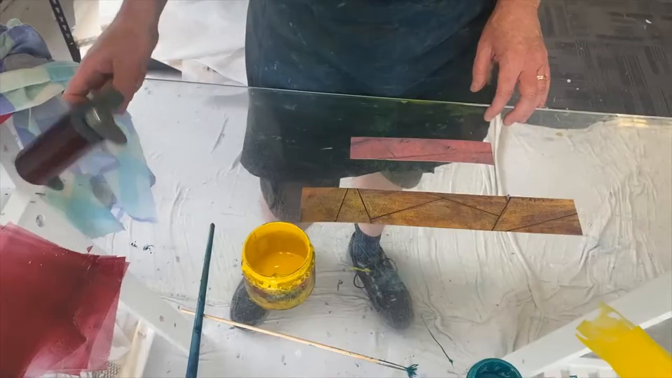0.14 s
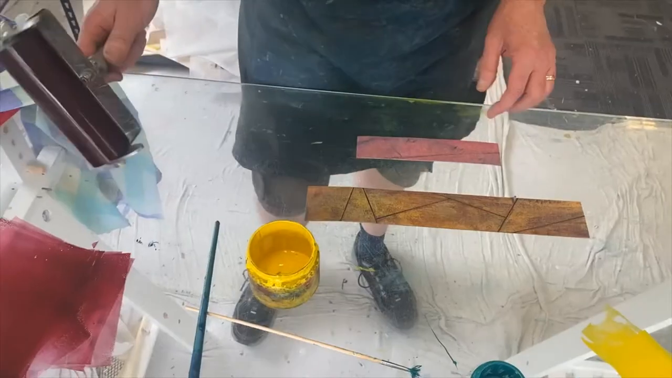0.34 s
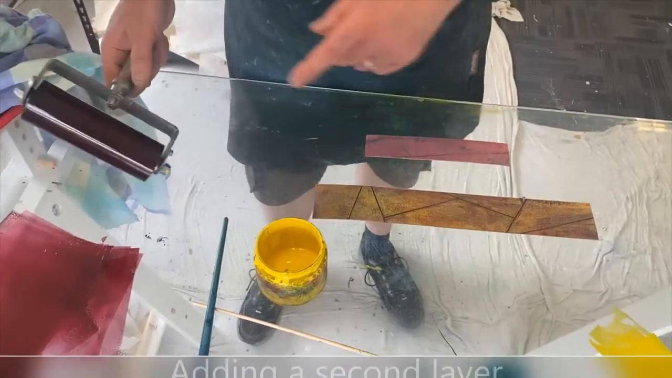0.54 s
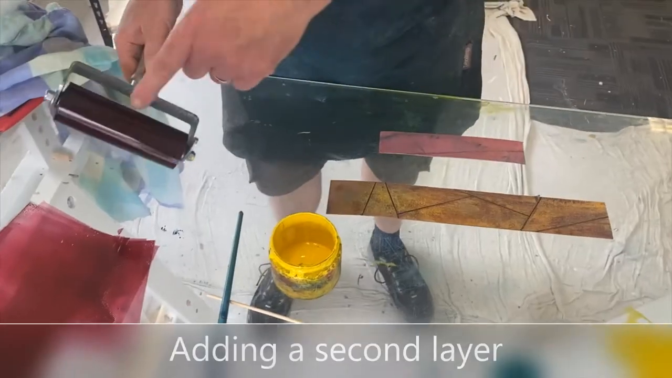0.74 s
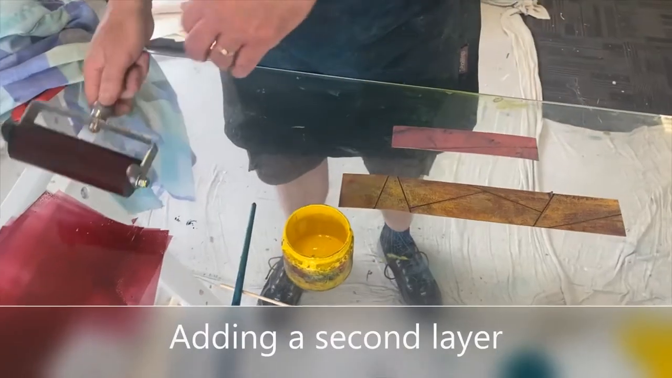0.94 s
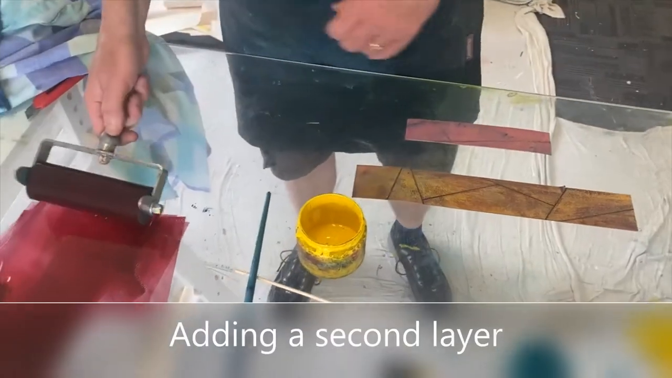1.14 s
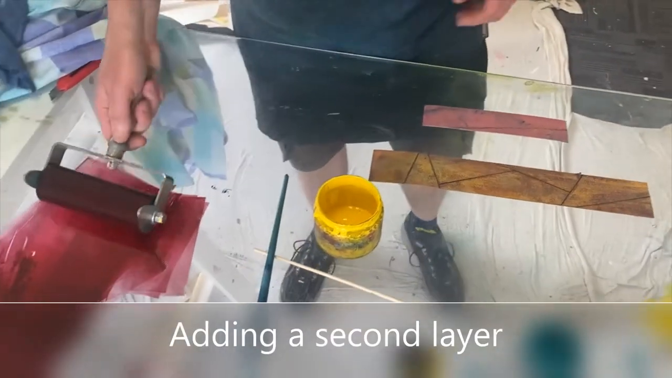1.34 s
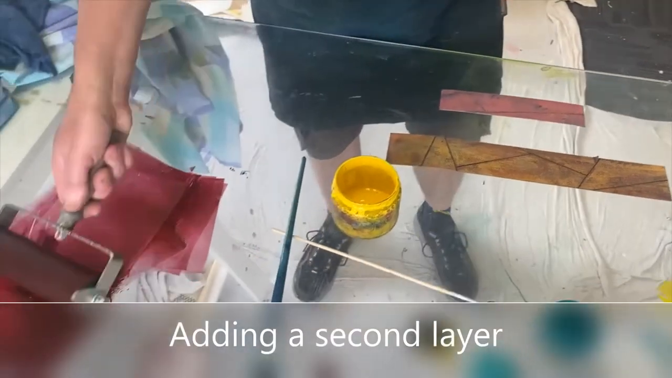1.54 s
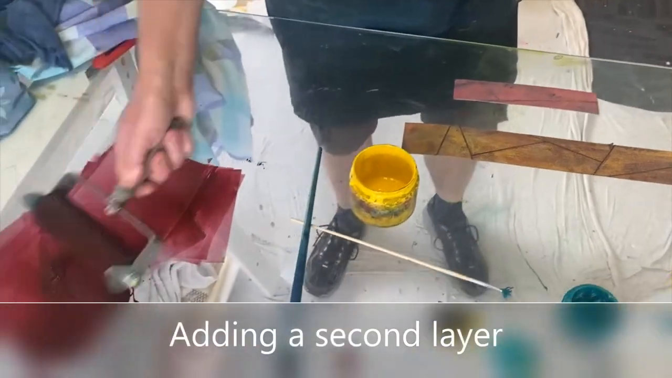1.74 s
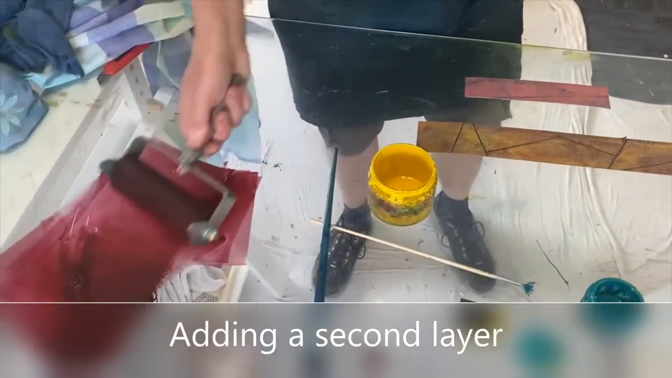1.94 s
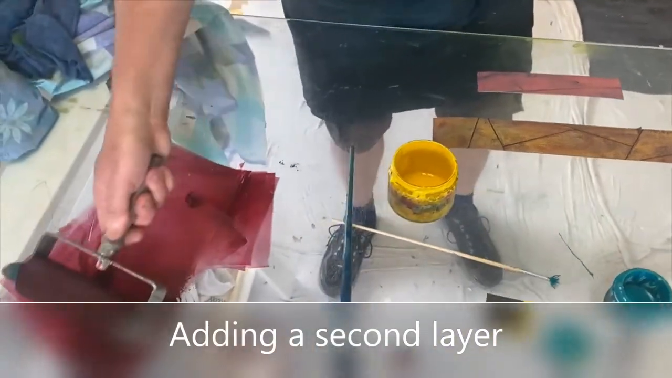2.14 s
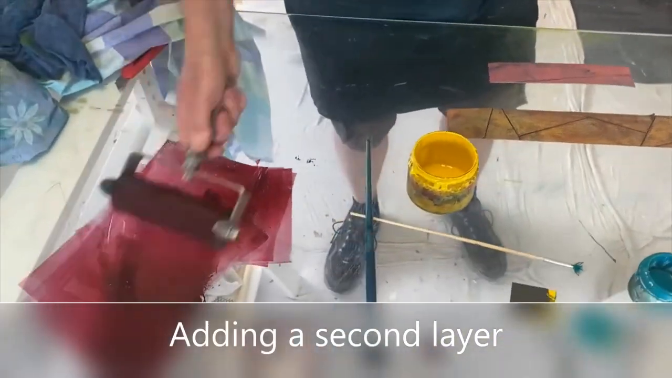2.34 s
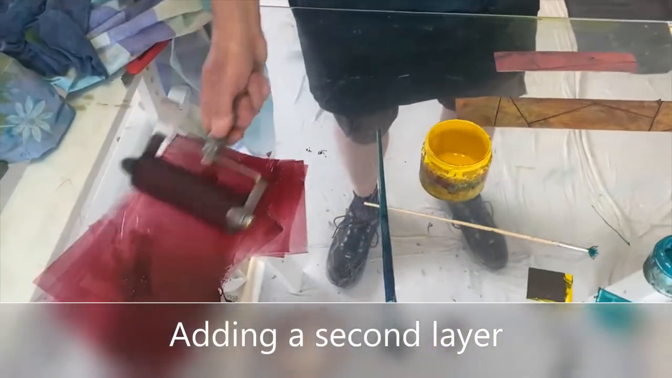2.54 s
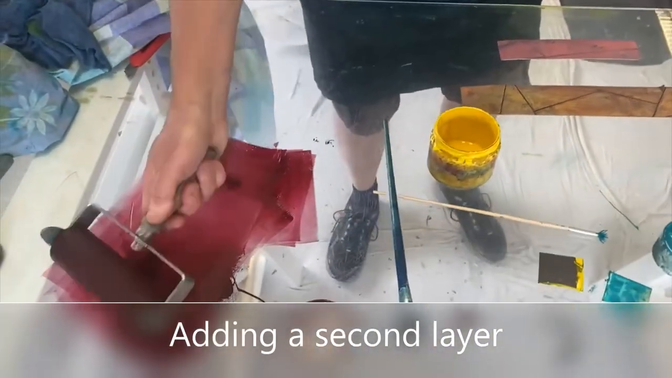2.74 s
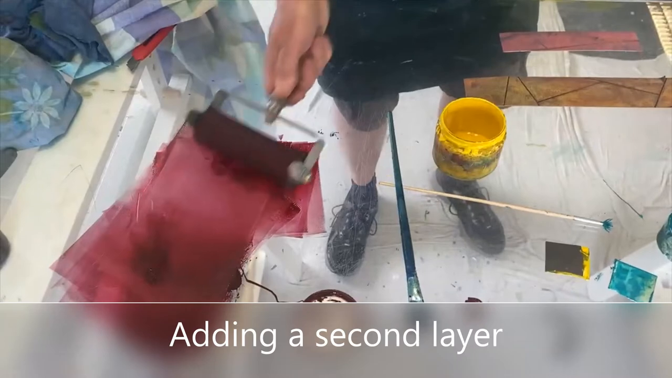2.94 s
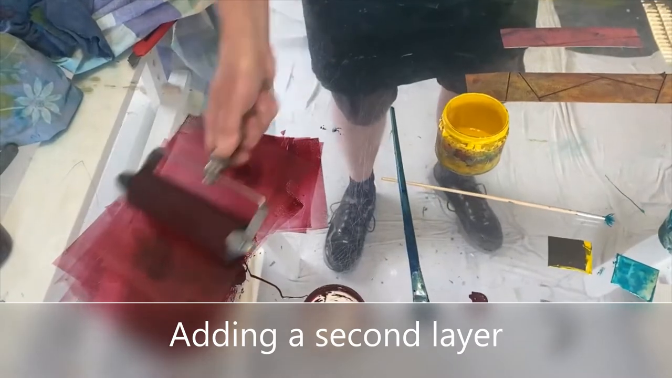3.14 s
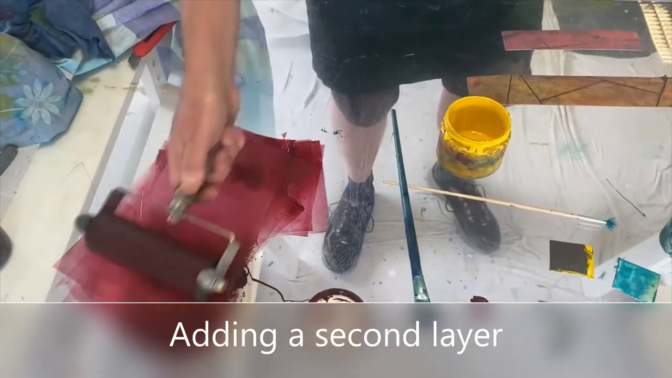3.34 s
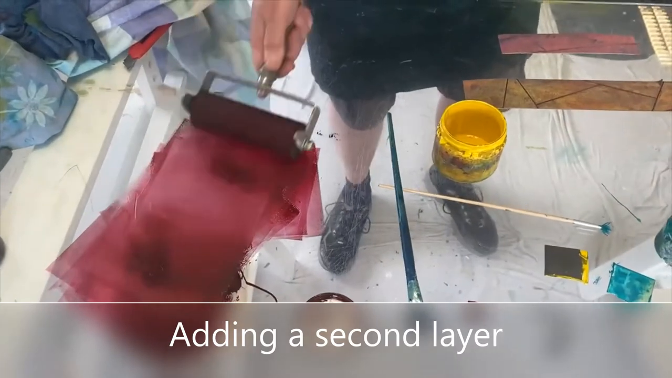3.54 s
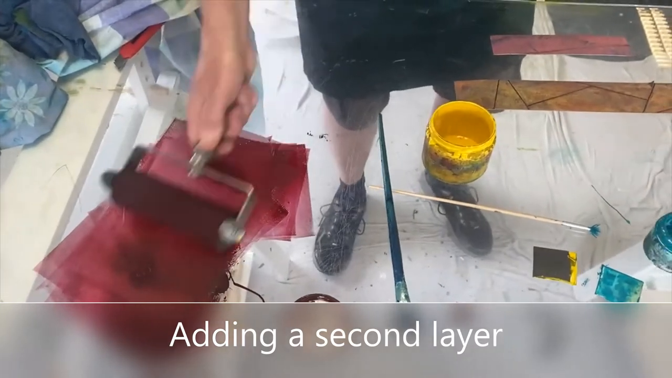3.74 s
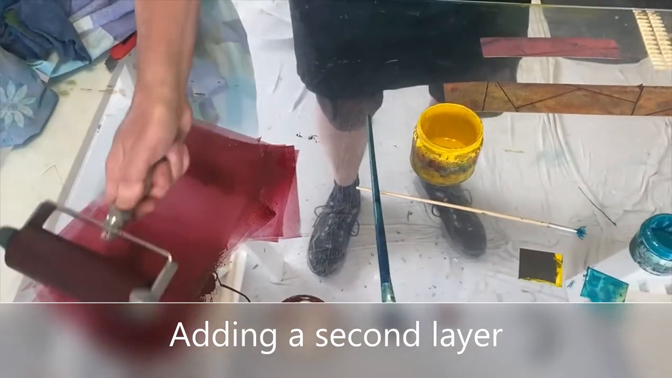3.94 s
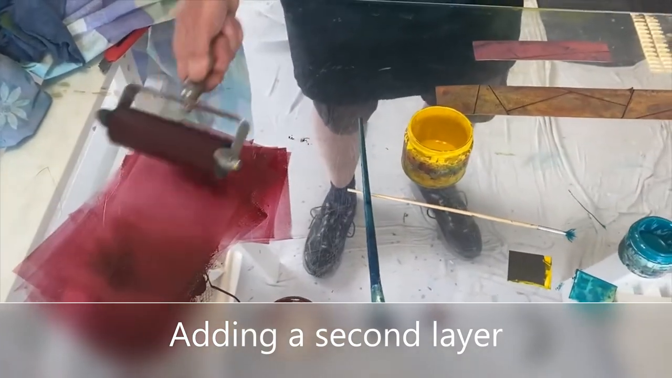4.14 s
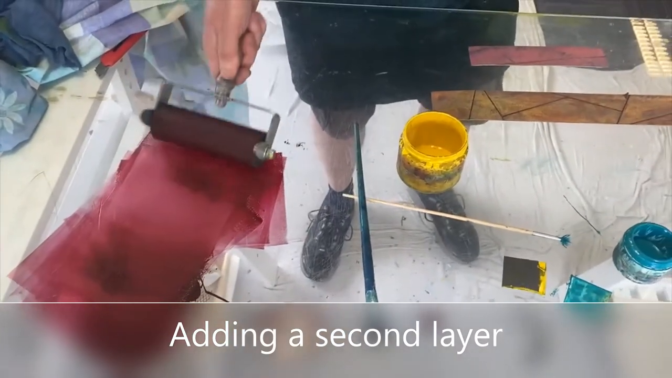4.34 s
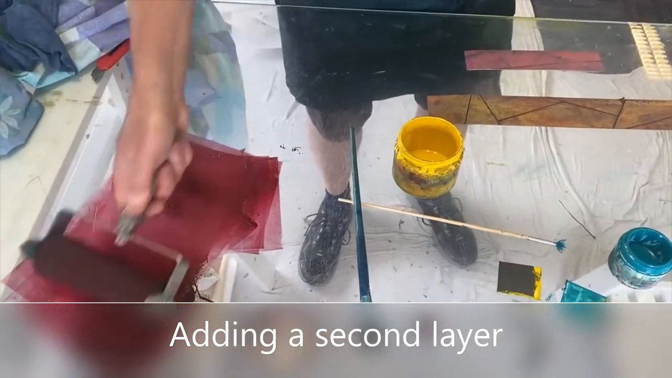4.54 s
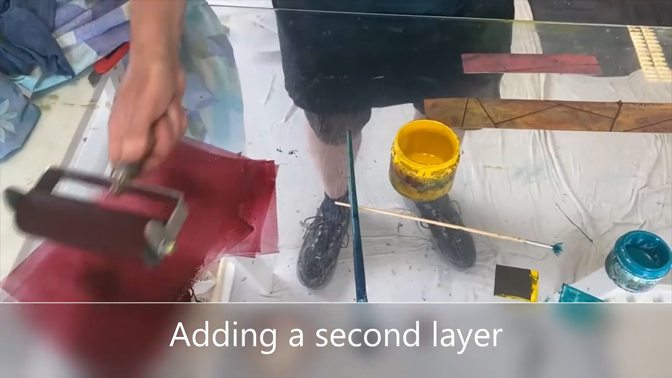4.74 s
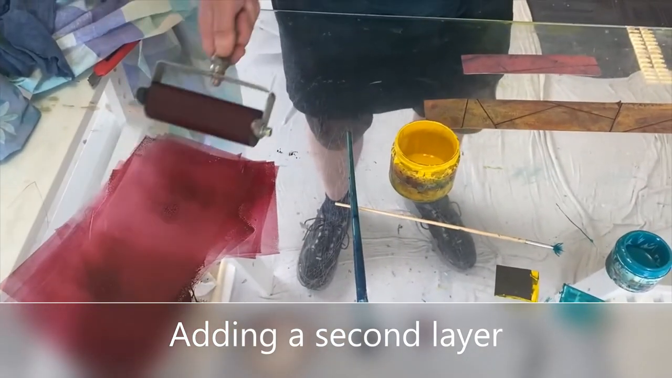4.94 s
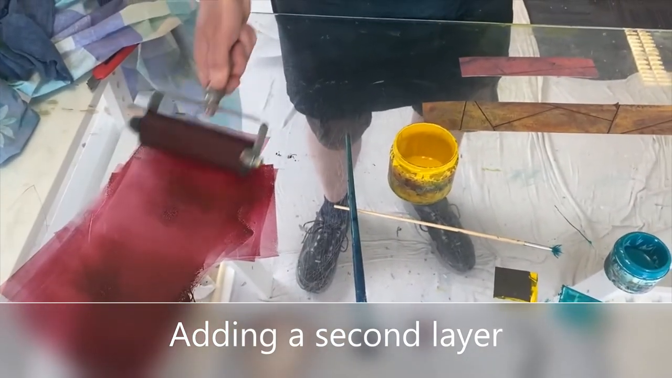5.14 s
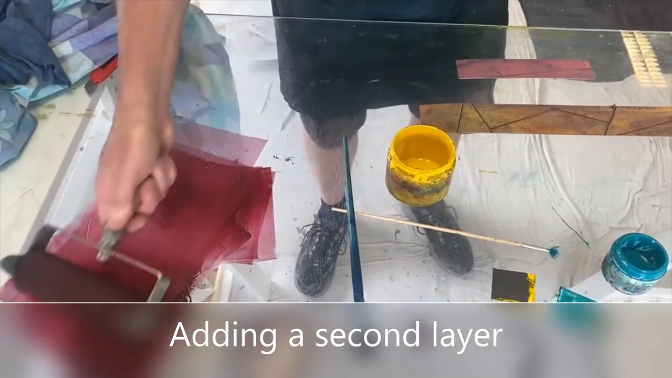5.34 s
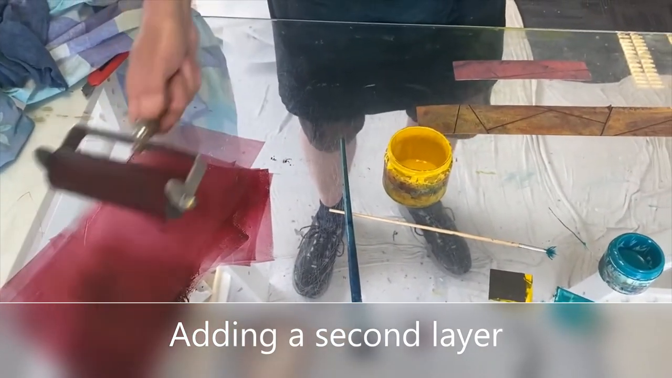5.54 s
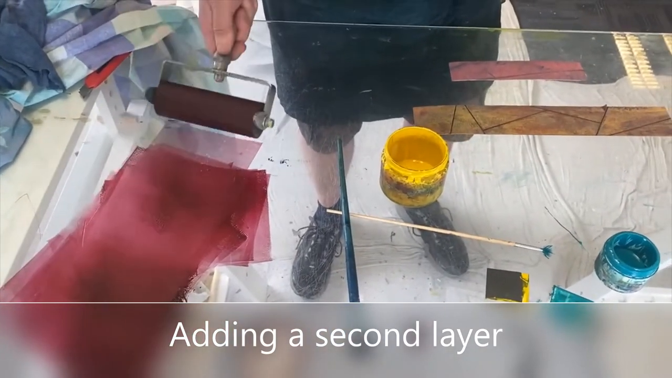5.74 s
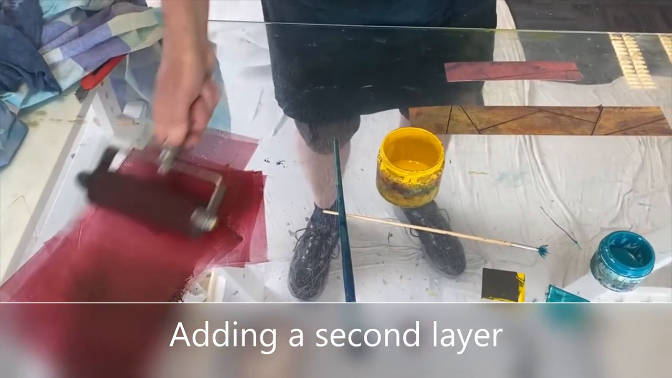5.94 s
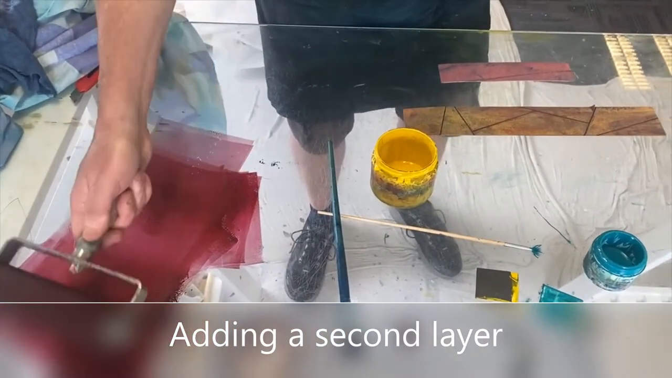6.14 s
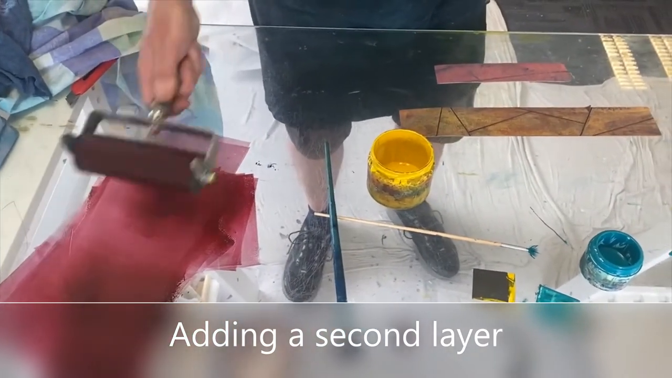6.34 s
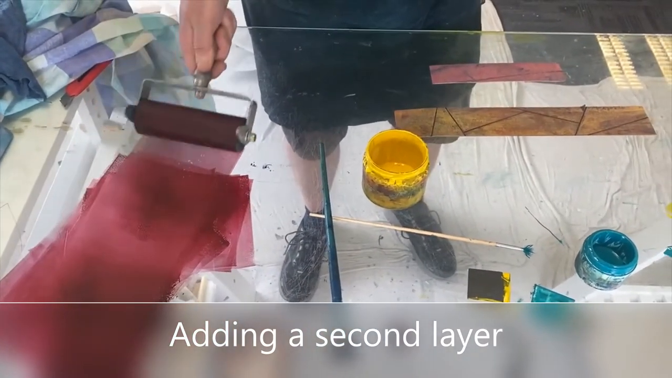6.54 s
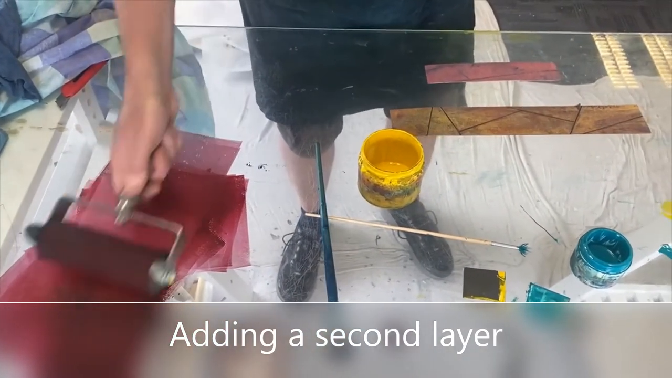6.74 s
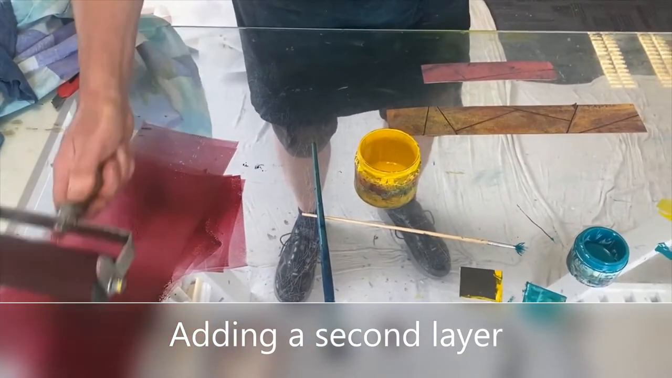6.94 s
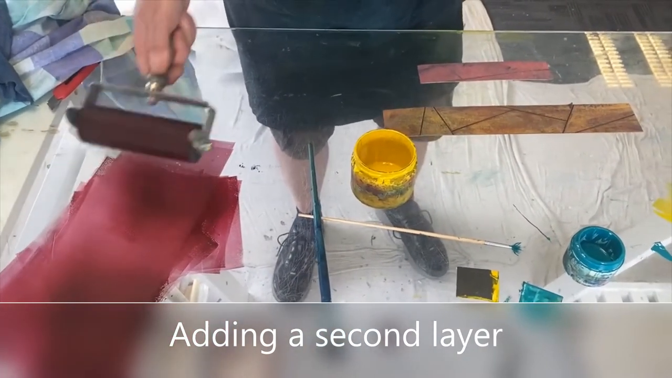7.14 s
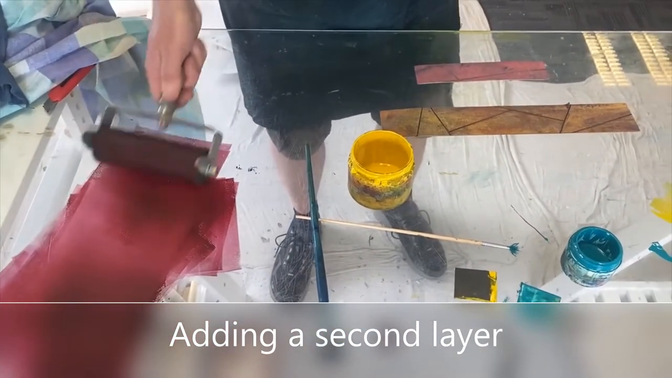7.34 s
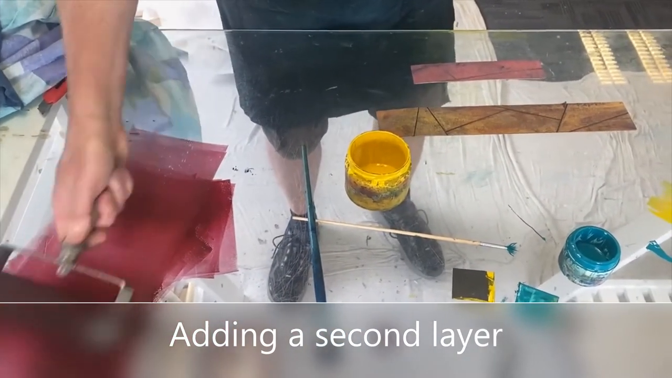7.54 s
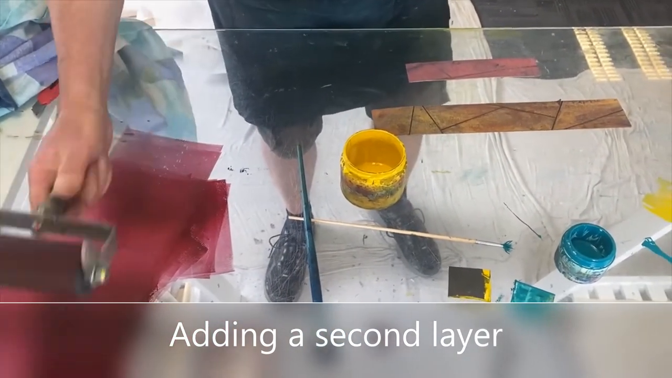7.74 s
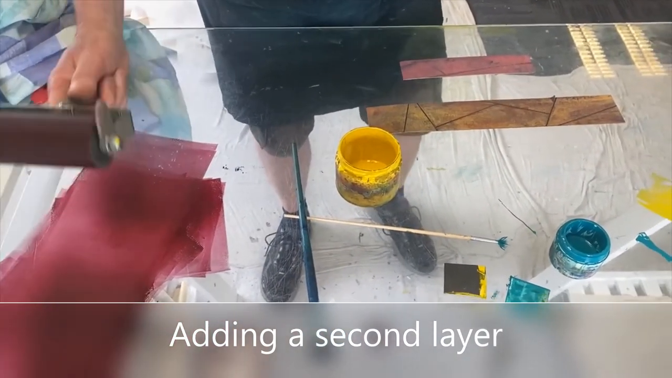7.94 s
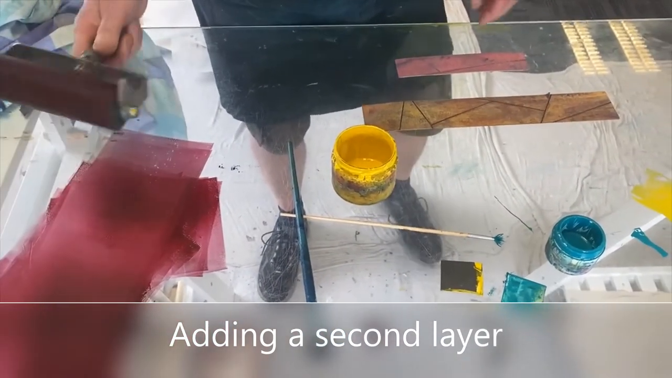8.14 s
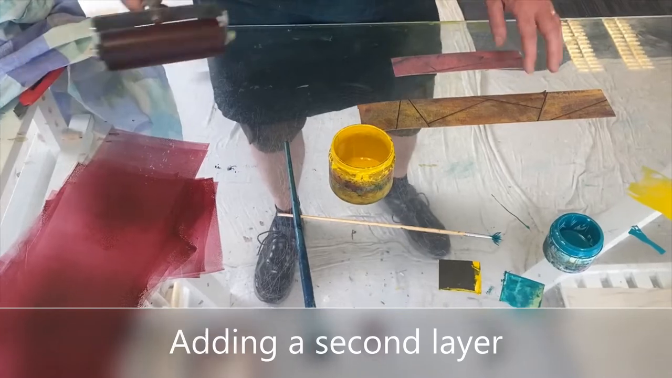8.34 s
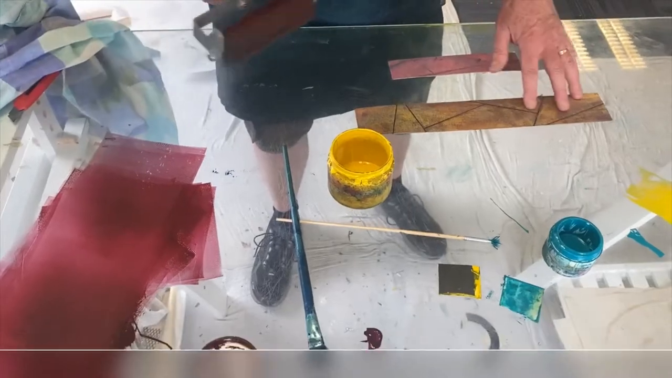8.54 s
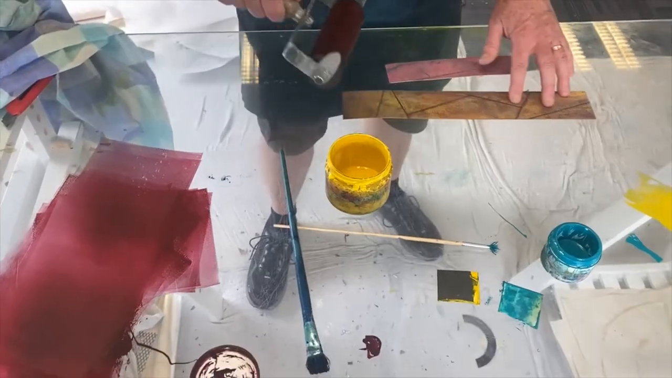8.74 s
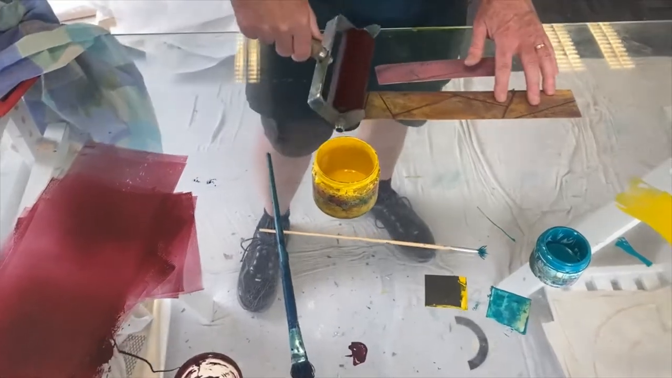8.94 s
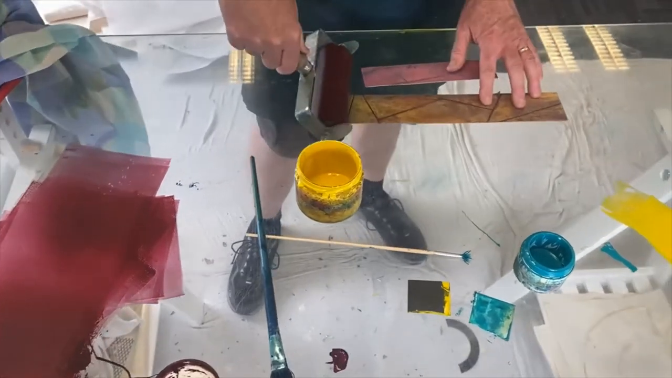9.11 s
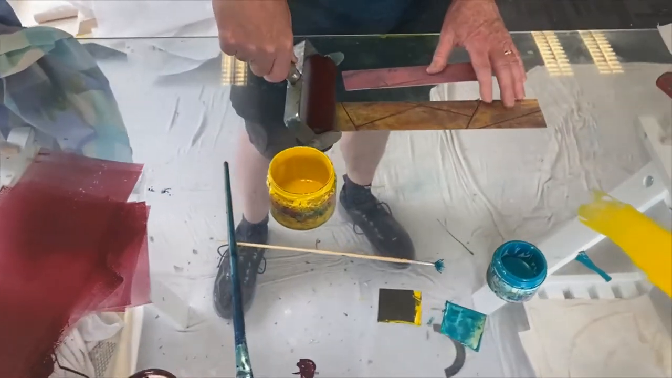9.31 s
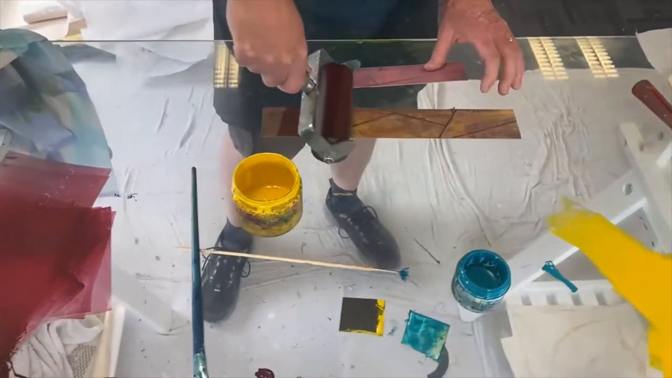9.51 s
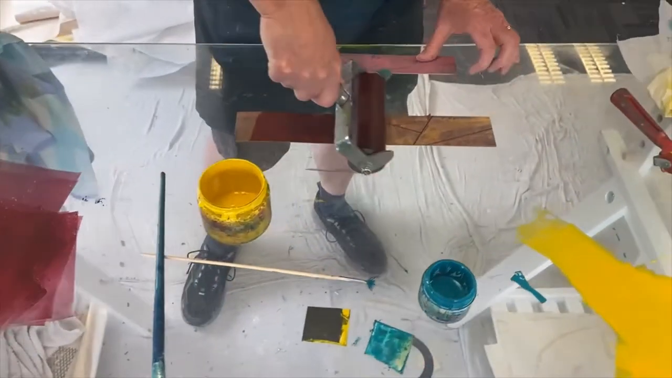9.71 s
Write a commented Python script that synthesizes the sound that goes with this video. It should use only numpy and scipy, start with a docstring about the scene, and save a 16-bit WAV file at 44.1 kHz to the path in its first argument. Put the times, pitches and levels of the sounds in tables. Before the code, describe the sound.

Close by in a quiet studio with a low rumble, an ink roller lands on glass and hisses back and forth, the tacky ink crackling and snapping behind it. The strokes then become spaced pushes, with the slab thudding and the metal frame clacking at each landing. At the end fingers rub and click faintly on the handle, and the roller runs softly over wood.

```python
"""A print studio: a rubber hand roller is worked through tacky ink on a glass slab.
Ink threads snap behind it in a dense rasp that swells twice a stroke, first back and forth, then one way.
Each landing thumps the slab and clacks the metal frame. At the end the roller is turned in the hand
and run lightly over a wooden strip. The room rumbles softly throughout."""
import sys
import numpy as np
from scipy import signal
from scipy.fft import rfft, irfft, next_fast_len
from scipy.io import wavfile

SR = 44100
rng = np.random.default_rng(int(sys.argv[2]) if len(sys.argv) > 2 else 0)


def transcribe(signal):
    """Save signal, clipped to [-1, 1], as a 16-bit WAV file at the path in sys.argv[1]."""
    frames = np.atleast_2d(signal).T
    limited = np.clip(frames, -1, 1)
    pcm = np.round(limited * 32767).astype(np.int16)
    wavfile.write(sys.argv[1], SR, pcm)


N = 435266
TIME = np.arange(N) / SR
FFT_SIZE = next_fast_len(N + 2000, real=True)
BINS_HZ = np.maximum(np.arange(FFT_SIZE // 2 + 1) * SR / FFT_SIZE, 1)

# Back-and-forth strokes. Each row: start and end in seconds, even film in dB, first swell in seconds
# and dB, second swell in seconds and dB, direction (1 push, -1 pull), extra coarse tearing in dB.
STROKES = [(1.248, 1.577, -52.5, 1.29, -54, 1.503, -39, 1, 0),
           (1.68, 1.856, -51.5, 1.732, -34.5, 1.833, -44, 1, 1.5),
           (1.912, 2.11, -50, 1.925, -43.5, 2.064, -30, -1, -1),
           (2.195, 2.42, -47, 2.256, -31.5, 2.394, -32, 1, 0.5),
           (2.495, 2.693, -48, 2.508, -35.5, 2.652, -30, -1, -1),
           (2.76, 2.966, -47, 2.804, -28, 2.92, -30.5, 1, 1),
           (3.015, 3.234, -49.5, 3.076, -34.5, 3.192, -29.5, -1, 0.5),
           (3.319, 3.551, -48, 3.343, -25.5, 3.474, -29, 1, 0.5),
           (3.623, 3.834, -49.5, 3.69, -32.5, 3.815, -30.5, -1, 1)]
# Rubber lands on the slab, often one end first. Each row: time in seconds, thump in relative dB,
# hardness in dB per octave, ring length relative to the free slab, clack in dB.
LANDINGS = [(1.153, -38.5, 0.5, 3.9, -33.5), (1.199, -14, 4, 0.68, -29.5), (1.695, -37, -0.7, 1.45, -21),
            (2.397, -28.5, 1.5, 0.8, -33), (4.283, -38, 9.5, 0.73, -35.5), (4.3, -15.5, 3.2, 0.86, -37.5),
            (5.027, -21.5, 5, 0.34, -31), (5.041, -24, 0, 1.08, -34), (5.772, -24, 2.7, 1.26, -26),
            (6.495, -18, 4, 0.85, -25.5), (6.819, -34, 1.5, 1.3, -49), (7.265, -24.5, -2.5, 1.13, -24),
            (7.275, -17, 2, 0.94, -37)]
# Glass slab on trestles. Each row: frequency in Hz, relative level in dB, t60 in seconds.
SLAB_MODES = [(43.54, -13.5, 1), (81.66, -1.5, 0.46), (101.5, -3, 0.29), (141.3, 4.5, 0.14),
              (231.5, -8.5, 0.13), (262, -9, 0.19), (358.5, -10.5, 0.073), (470, -13.5, 0.04),
              (700, -29.5, 0.015), (983, -23.5, 0.049), (1396, -27.5, 0.055), (1785, -34.5, .05)]
# Stereo image of the roller. Each row: frequency in Hz, left-right correlation.
ROLLER_CORRELATION = [(300, 0.49), (900, 0.42), (2000, 0.13), (4000, 0.67), (16000, 1)]


def from_db(db):
    """Decibels to gain."""
    return 10 ** (np.asarray(db) / 20)


def unit_rms(x):
    """Scale to rms 1."""
    return x / np.sqrt(np.mean(x ** 2) + 1e-20)


def at_hz(points, hz):
    """Read a table on a log-frequency axis."""
    points = np.array(points)
    return np.interp(np.log(hz), np.log(points[:, 0]), points[:, 1])


def drift(rate_hz):
    """Slow random wander, rms 1."""
    pole = np.exp(-80 * np.pi * rate_hz / SR)   # one step per 40 samples
    slow = signal.lfilter([1], [1, -2 * pole, pole * pole], rng.standard_normal(N // 40 + 2002))[2000:]
    return np.interp(np.arange(N) / 40, np.arange(len(slow)), unit_rms(slow))


def colour(pair, spectrum, correlation):
    """Two independent signals to stereo of given spectrum and correlation, rms 1."""
    subsonic_cut = BINS_HZ ** 2 / (BINS_HZ ** 2 + 20 ** 2)
    mid, side = rfft(pair, FFT_SIZE) * from_db(at_hz(spectrum, BINS_HZ)) * subsonic_cut
    alike = np.clip(at_hz(correlation, BINS_HZ), -.99, .99)
    stereo = np.sqrt(1 + alike) * mid + np.sqrt(1 - alike) * side * [[1], [-1]]
    return unit_rms(irfft(stereo, FFT_SIZE)[:, :N])


def butterworth(x, hz, kind):
    """Butterworth filter, 12 dB per octave."""
    return signal.sosfilt(signal.butter(2, hz, kind, fs=SR, output="sos"), x)


def ring(force, hz, t60_s):
    """One mode: a unit impulse starts a decaying sine of height 1."""
    r, w = from_db(-60 / (t60_s * SR)), 2 * np.pi * hz / SR
    return signal.lfilter([0, np.sin(w)], [1, -2 * r * np.cos(w), r * r], force + 1e-18)


def resonance(x, hz, width_hz):
    """Resonator with peak gain 1."""
    r, w = np.exp(-np.pi * width_hz / SR), 2 * np.pi * hz / SR
    return signal.lfilter(np.array([1, 0, -1]) * (1 - r * r) / 2, [1, -2 * r * np.cos(w), r * r], x + 1e-18)


def snaps(per_s, spread_db):
    """Two trains of tiny random snaps of uneven size and steady mean power."""
    chance = np.clip(per_s / SR, 1e-4, 1)
    sizes = from_db(spread_db * np.minimum(rng.exponential(1, (2, N)), 4)) * rng.choice([-1, 1], (2, N))
    return (rng.random((2, N)) < chance) * sizes / np.sqrt(chance)


def room_tone(rumble_db, whine_hz):
    """Soft rumble; a thin whine and its octave sound at first and stop as the level dips briefly."""
    # Each row: frequency in Hz, relative density in dB.
    rumble_spectrum = [(25, -10.5), (45, -1), (80, 3.5), (110, -1.5), (160, -5.5), (200, -14), (265, -9.5),
                       (400, -19), (600, -24), (900, -28), (1600, -37), (3000, -53.5), (8000, -62.5),
                       (16000, -61.5)]
    # Each row: frequency in Hz, left-right correlation.
    correlation = [(60, 0.98), (250, 0.47), (600, 0.034), (1500, 0.05), (16000, 0.044)]
    rumble = from_db(rumble_db) * colour(rng.standard_normal((2, N)), rumble_spectrum, correlation)
    phase = 2 * np.pi * whine_hz * TIME
    whine = (from_db(-77) * np.sin(phase) + from_db(-68.5) * np.sin(2 * phase)) * (TIME < .125)
    dip = np.interp(TIME, [.1, .122, .135, .16], [1, .05, .05, 1])
    return (rumble + whine) * dip


def faint_murmur(hz, width_hz, decay_s):
    """A faint, dull band of noise fades away."""
    # Each row: start in seconds, level in dB.
    murmurs = [(0.162, -59.5)]
    envelope = sum(from_db(db) * (TIME > s) * np.exp(-np.abs(TIME - s) / decay_s) for s, db in murmurs)
    band = resonance(rng.standard_normal((2, N)), hz, width_hz)
    return envelope * unit_rms(resonance(band, hz, 2 * width_hz))


def clicks_and_clacks(crack_s, rattle_s, rattle_db, ring_db):
    """Bright snaps, probably of ink, and clacks of the metal frame: crack, brief rattle, faint ring."""
    # Bright snaps during the strokes and light clacks of the frame.
    # Each row: time in seconds, peak in dB, brightness in Hz (higher for a sharper click).
    sharp_clicks = [(0.1704, -47.5, 3400), (.338, -41, 5950), (0.8127, -57, 3570), (1.654, -32.5, 4560),
                    (2.0694, -18, 14600), (2.2159, -19, 11400), (2.2412, -18, 15200), (2.381, -27, 12000),
                    (2.506, -29.5, 10000), (2.7472, -29.5, 14800), (2.799, -19.5, 7500),
                    (7.7135, -47, 11850), (7.9987, -44.5, 2800), (8.0611, -44, 3420), (8.1204, -50, 3250),
                    (8.2832, -53, 3480), (8.5165, -40.5, 2870), (8.533, -44.5, 2700), (9.1385, -47, 3040),
                    (9.1554, -41.5, 5500)]
    # Each row: frequency in Hz, width in Hz, relative level in dB.
    frame_resonances = [(1160, 190, 0.5), (2003, 870, -0.5), (3080, 66, 8), (3550, 440, 3),
                        (4950, 570, 6.5), (6910, 1100, 5.5), (11030, 630, 4), (14800, 1400, -2.5)]
    # Each row: frequency in Hz, relative level in dB, t60 in seconds.
    ringing_modes = [(2033, -5.5, 0.11), (2820, 3, 0.07), (3410, -0.5, 0.11), (3790, 2, .09),
                     (4600, -19, 0.25), (4870, -7.5, .08), (7150, -13.5, 0.088)]
    out, t = np.zeros((2, N)), TIME[:SR // 6]
    envelope = np.exp(-t / crack_s) + from_db(rattle_db) * np.exp(-t / rattle_s)
    landing_clacks = [(s, clack_db, 4300) for s, *_, clack_db in LANDINGS]
    for s, peak_db, brightness_hz in sharp_clicks + landing_clacks:
        mid, side = rng.standard_normal((2, len(t))) * envelope
        burst = mid + .5 * side * [[1], [-1]]
        tilt_db_per_octave = 5 * np.log2(brightness_hz / 5500)
        click = 0
        for k, (hz, width_hz, db) in enumerate(frame_resonances):
            gain = from_db(db + tilt_db_per_octave * np.log2(hz / 5000))
            click += (-1) ** k * gain * resonance(burst, hz, width_hz)
        click /= 3 * np.std(click[:, :SR // 200])   # peak near 1
        for hz, db, t60_s in ringing_modes:
            phase_turns = rng.random() + rng.normal(0, 0.18, (2, 1))
            decay = from_db(ring_db + db - 0.91 * tilt_db_per_octave - 60 * t / t60_s)
            click += decay * np.sin(2 * np.pi * (hz * t + phase_turns))
        start = int(s * SR)
        out[:, start:start + len(t)] += from_db(peak_db) * click
    return out


def handling(gain_db, edge_drop_db):
    """Fingers rub the handle in small uneven catches while the roller is in the air."""
    # Each row: centre in seconds, relative level in dB, half length in seconds.
    rubs = [(0.23, -60.5, 0.076), (.58, -64, 0.13), (0.886, -68.5, 0.27), (7.888, -65.5, 0.056),
            (8.026, -52, 0.058), (8.3, -65, 0.086), (8.678, -66, 0.17), (9.105, -61.5, .03)]
    # Each row: frequency in Hz, relative density in dB.
    rustle_spectrum = [(600, -22), (1200, 8.5), (2500, 5.5), (4000, 5), (7000, -2.5), (11000, 1.5),
                       (16000, -34)]
    grip = drift(5.3)
    catches = snaps(1200 * from_db(4 * grip), spread_db=2)
    rustle = colour(catches, rustle_spectrum, ROLLER_CORRELATION) * from_db(3 * grip)
    envelope = sum(from_db(db - edge_drop_db * np.minimum(((TIME - s) / half_s) ** 2, 20))
                   for s, db, half_s in rubs)
    return from_db(gain_db) * envelope * rustle


def slab_thumps(contact_s, gain_db):
    """Landings ring the slab; harder blows favour higher modes, and the roller's weight damps them."""
    out, t = np.zeros(N), TIME[:SR]
    for s, thump_db, hardness, ring_length, _ in LANDINGS:
        start = int(s * SR)
        for k, (hz, db, t60_s) in enumerate(SLAB_MODES):
            gain = from_db(gain_db + thump_db + db + hardness * np.log2(hz / 150) + rng.normal(0, 0.85))
            decay = from_db(-60 * t / (t60_s * max(ring_length, .5)))
            envelope = decay - from_db(-60 * t / (contact_s + 2 / hz))   # the glass swings up gradually
            loaded_hz = hz * rng.normal(1, .015)   # pitch varies with where the roller presses
            out[start:start + len(t)] += (-1) ** k * gain * envelope * np.sin(2 * np.pi * loaded_hz * t)
    return out


def shudder(decay_s, gain_db):
    """Each landing shakes the trestles and the things on the glass: a dull, unpitched thud."""
    envelope, t = np.zeros(N), TIME[:SR // 2]
    attack = 1 - np.exp(-t / 0.0019)
    for s, thump_db, hardness, ring_length, _ in LANDINGS:
        start = int(s * SR)
        decay = np.exp(-t / (decay_s * max(ring_length, .5)))
        envelope[start:start + len(t)] += from_db(thump_db + hardness) * attack * decay
    thud = unit_rms(butterworth(rng.standard_normal(N), [55, 350], "band"))
    return from_db(gain_db) * envelope * thud


def swell(peak_s, peak_db, rise_db_per_s, fall_db_per_s, crest_s):
    """Rasp power as the roller's tackiest patch meets the glass: rise, rounded crest, fall."""
    away_s = np.hypot(TIME - peak_s, crest_s) - crest_s
    loss_db = away_s * np.where(TIME < peak_s, rise_db_per_s, fall_db_per_s)
    return from_db(np.maximum(peak_db - loss_db, -150)) ** 2


def stroke_gate(start_s, end_s, rise_db_per_s, fall_db_per_s):
    """Power gain: 1 while the roller runs, dying away on both sides."""
    loss_db = rise_db_per_s * np.maximum(start_s - TIME, 0) + fall_db_per_s * np.maximum(TIME - end_s, 0)
    return from_db(-np.minimum(loss_db, 150)) ** 2


def back_and_forth_power():
    """Even film plus two swells a stroke; a push meets the tacky patch's sharp edge first, a pull last."""
    sharp_db_per_s, thin_db_per_s = 599, 188.5
    power = 0
    for start_s, end_s, film_db, first_s, first_db, second_s, second_db, direction, _ in STROKES:
        edges = (sharp_db_per_s, thin_db_per_s) if direction > 0 else (thin_db_per_s, sharp_db_per_s)
        swells = swell(first_s, first_db, *edges, crest_s=0.0073)
        swells += swell(second_s, second_db, *edges, crest_s=0.0073)
        gate = stroke_gate(start_s, end_s, rise_db_per_s=603.5, fall_db_per_s=546.5)
        power += (from_db(film_db) ** 2 + swells) * gate
    return power


def tearing_db(glass_db):
    """Coarse tearing follows the rasp in part and is stronger where a stroke meets thicker ink."""
    thickness = [(s, extra_db) for start_s, end_s, *_, extra_db in STROKES for s in (start_s, end_s)]
    return -49.5 + 0.68 * (glass_db + 34.5) + np.interp(TIME, *np.transpose(thickness))


def ink_rasp(fine_db, coarse_db):
    """Ink threads stretch and snap behind the rubber; faster rolling breaks more of them."""
    # Each row of both: frequency in Hz, relative density in dB.
    fine_spectrum = [(1500, -31.5), (3000, -15.5), (4800, -0.5), (7200, 1.5), (9000, 0), (11300, 5.5),
                     (15500, 5), (17000, -57.5)]
    coarse_spectrum = [(300, 8.5), (600, -6), (1000, 2), (1500, 3.5), (2200, 4.5), (3200, 4.5), (4500, 5.5),
                       (8000, -69)]
    speed = from_db(.5 * (np.maximum(fine_db, -70) + 35.5))
    uneven_film_db = drift(43)
    fine = colour(snaps(14000 * speed, spread_db=3), fine_spectrum, ROLLER_CORRELATION)
    coarse = colour(snaps(3000 * speed, spread_db=2), coarse_spectrum, ROLLER_CORRELATION)
    return from_db(uneven_film_db) * (from_db(fine_db + 1.5) * fine + from_db(coarse_db + 2) * coarse)


def nearby_echoes(x, wander, stereo_spread):
    """Glass, hand and apron reflect the rasp; the paths wander, so its colour shifts."""
    # Each row: delay in seconds, level in dB relative to the direct sound.
    paths = [(.0015, -11.5), (.0021, -6.5), (.0039, -13.5), (.0064, -7)]
    index, out = np.arange(N), x.copy()
    for delay_s, db in paths:
        path_s = delay_s * (1 + wander * drift(1.195))
        for channel in range(2):
            lag_samples = path_s * (1 + stereo_spread * drift(0.84)) * SR
            out[channel] += from_db(db) * np.interp(index - lag_samples, index, x[channel])
    return out / np.sqrt(1 + sum(from_db(db) ** 2 for _, db in paths))


def rolling(rasp_db, lag_s, level_db):
    """The turning rubber shakes the slab just after each swell, more gently than its rasp grows."""
    force = rng.standard_normal(N) * from_db(.36 * np.interp(TIME - lag_s, TIME, rasp_db))
    force = butterworth(force, 105, "high")
    slab = sum(from_db(db) * ring(force, hz, t60_s) for hz, db, t60_s in SLAB_MODES)
    return from_db(level_db) * unit_rms(slab)


def one_way_power(turn_s, film_db, first_db, second_db):
    """Rasp power as the roller is set down, pushed for two turns and lifted off."""
    # Each row: start, first swell and lift, all in seconds.
    pushes = [(4.313, 4.41, 4.597), (5.063, 5.193, 5.335), (5.806, 5.92, 6.078), (6.542, 6.663, 6.818),
              (7.294, 7.4, 7.555)]
    shape = dict(rise_db_per_s=290.5, fall_db_per_s=395, crest_s=0.028)
    power = 0
    for start_s, first_s, lift_s in pushes:
        swells = swell(first_s, first_db, **shape) + swell(first_s + turn_s, second_db, **shape)
        gate = stroke_gate(start_s, lift_s, rise_db_per_s=1499.5, fall_db_per_s=900.5)
        power += (from_db(film_db) ** 2 + swells) * gate
    return power


def axle_ticks(hz, width_hz, decay_s):
    """The free-spinning roller catches on its axle once a turn and rings one frame resonance."""
    # Each row: time in seconds, relative level in dB.
    ticks = [(6.901, -54), (6.993, -47), (7.082, -50.5), (7.172, -57)]
    envelope = sum(from_db(db) * (TIME > s) * np.exp(-np.abs(TIME - s) / decay_s) for s, db in ticks)
    rub = resonance(rng.standard_normal(N), hz, width_hz)
    return 0.22 * envelope * unit_rms(resonance(rub, hz, 3 * width_hz))


def hollow_tap(hz, t60_s):
    """A soft contact as the roller is lifted away: two well-damped modes."""
    # Each row: time in seconds, level in dB.
    taps = [(8.197, -43.5)]
    force = np.zeros(N)
    for s, db in taps:
        force[int(s * SR)] = from_db(db)
    return ring(force, hz, t60_s) - 0.35 * ring(force, hz * 1.38, t60_s)


def wood_pass_db():
    """Rasp level as the roller runs lightly over the wooden strip."""
    # Each row: time in seconds, level in dB.
    levels = [(9.25, -69.5), (9.38, -57.5), (9.46, -57), (9.6, -47), (9.74, -61), (9.81, -55.5),
              (9.86, -53)]
    return np.interp(TIME, *np.transpose(levels), left=-150)


def studio_reverb(x):
    """Diffuse tail: octave bands of decaying noise, the midrange lasting longest."""
    # Each row: frequency in Hz, t60 in seconds.
    decay_times = [(80, 0.36), (500, .55), (4000, 0.59), (9000, 0.34), (16000, 0.49)]
    t, tail = TIME[:SR], 0
    edges_hz = np.geomspace(40, 18000, 10)
    for low_hz, high_hz in zip(edges_hz, edges_hz[1:]):
        band = butterworth(rng.standard_normal((2, SR)), [low_hz, high_hz], "band")
        tail += band * from_db(-60 * t / at_hz(decay_times, np.sqrt(low_hz * high_hz)))
    tail = unit_rms(tail * (1 - np.exp(-t / 0.01))) / np.sqrt(SR)
    return signal.fftconvolve(x, tail, axes=1)[:, :N]


def scene():
    """Ink, frame and slab close by, the studio around them."""
    glass_power = back_and_forth_power()
    glass_power += one_way_power(turn_s=0.13, film_db=-55.5, first_db=-36, second_db=-33)
    glass_db, wood_db = 10 * np.log10(glass_power), wood_pass_db()
    rasp = ink_rasp(fine_db=np.maximum(glass_db, wood_db),
                    coarse_db=np.maximum(tearing_db(glass_db), wood_db - 10.5))
    rasp = nearby_echoes(rasp, wander=.09, stereo_spread=0.0059) * from_db([[.3], [-.3]])
    small_sounds = clicks_and_clacks(crack_s=0.00036, rattle_s=0.011, rattle_db=-8.5, ring_db=-24)
    small_sounds += handling(gain_db=-6.5, edge_drop_db=13.5)
    small_sounds += faint_murmur(hz=850, width_hz=180, decay_s=0.28)
    small_sounds += axle_ticks(hz=2430, width_hz=570, decay_s=0.013)
    small_sounds += hollow_tap(hz=622.9, t60_s=0.021)
    slab = slab_thumps(contact_s=0.017, gain_db=-2) + shudder(decay_s=0.03, gain_db=-18)
    slab += rolling(glass_db, lag_s=.015, level_db=-49)
    slab = slab * from_db([[-.6], [.6]])
    reverb = studio_reverb(from_db(-19) * rasp + from_db(-13.5) * small_sounds + from_db(-8.5) * slab)
    return rasp + small_sounds + slab + reverb + room_tone(rumble_db=-47.16, whine_hz=1788)


def record(dry):
    """Two microphone ports share the bass and differ in phase higher up; steep cut at 16.1 kHz."""
    # Each row: frequency in Hz, lead of the left port in turns.
    port_phase = [(450, 0), (1400, .3), (2200, .25), (2800, 0), (7400, 0), (8600, -.47), (9300, -.53),
                  (10600, -1), (11650, -1), (12950, -1.47), (13550, -1.53), (14900, -2)]
    phase = 2 * np.pi * np.interp(BINS_HZ, *np.transpose(port_phase))
    mid, side = rfft(dry[0] + dry[1], FFT_SIZE) / 2, rfft(dry[0] - dry[1], FFT_SIZE) / 2
    # in the treble the ports agree best where they are in step or opposed
    treble = np.interp(BINS_HZ, [5500, 6800], [0, 1])
    side *= 1 - treble + treble * (.2 + 1.3 * np.abs(np.sin(phase)))
    side *= np.interp(BINS_HZ, [150, 500], [.55, 1])
    left, right = (mid + side) * np.exp(.5j * phase), (mid - side) * np.exp(-.5j * phase)
    ports = irfft(np.array([left, right]), FFT_SIZE)[:, :N]
    return signal.sosfilt(signal.ellip(12, .1, 80, 16100, fs=SR, output="sos"), ports)


dry = scene()
out = record(dry)
transcribe(out)
```